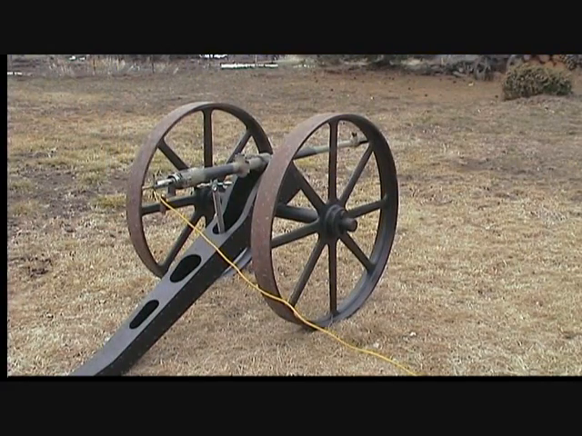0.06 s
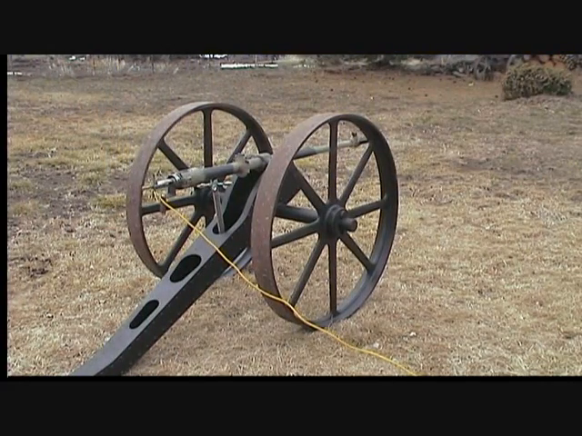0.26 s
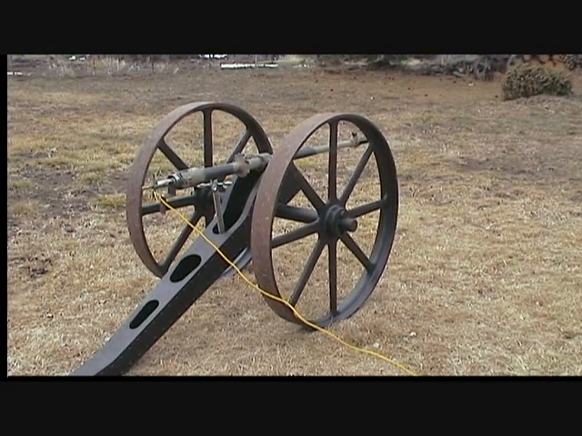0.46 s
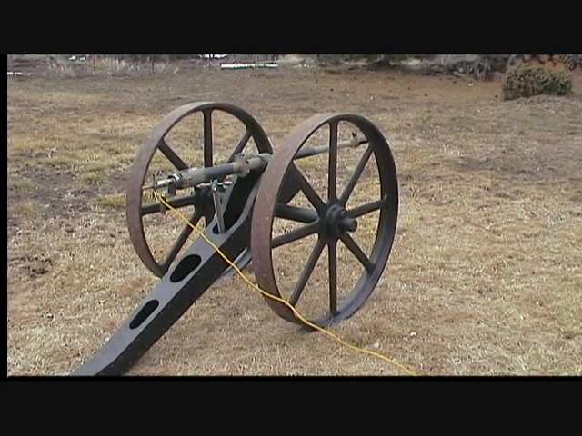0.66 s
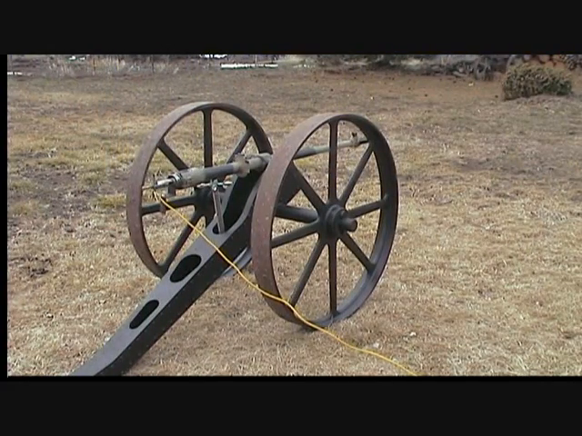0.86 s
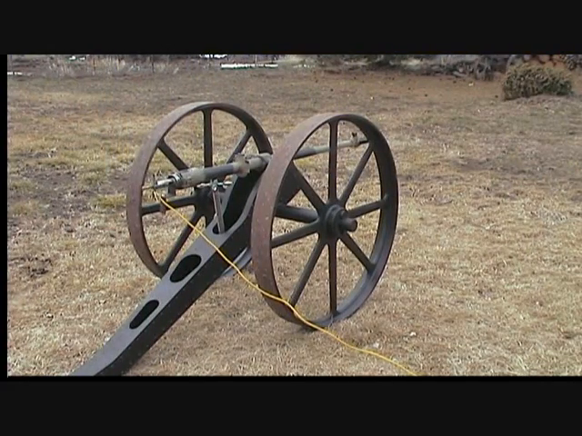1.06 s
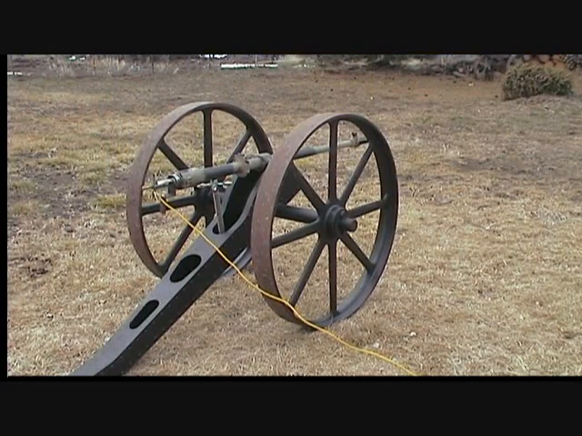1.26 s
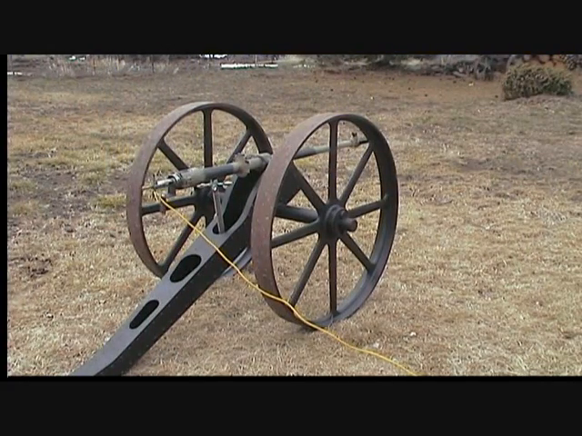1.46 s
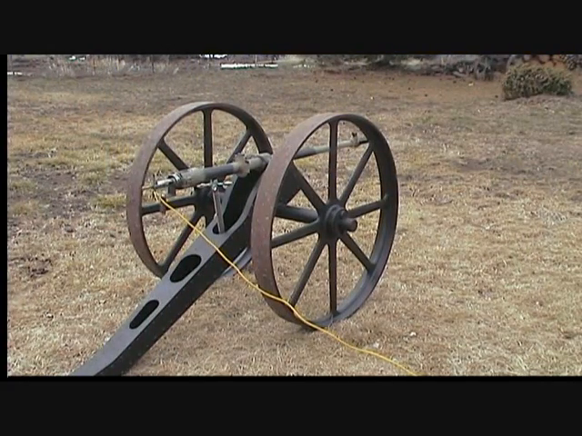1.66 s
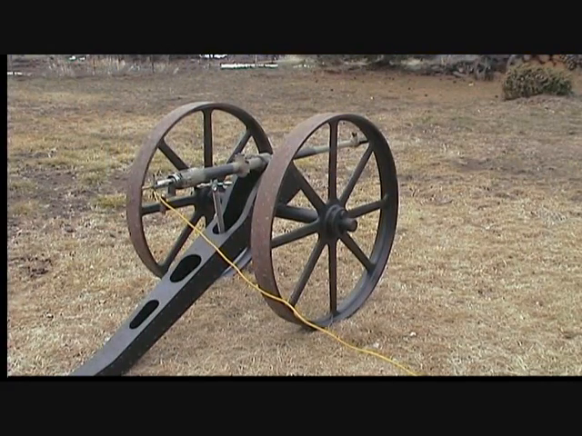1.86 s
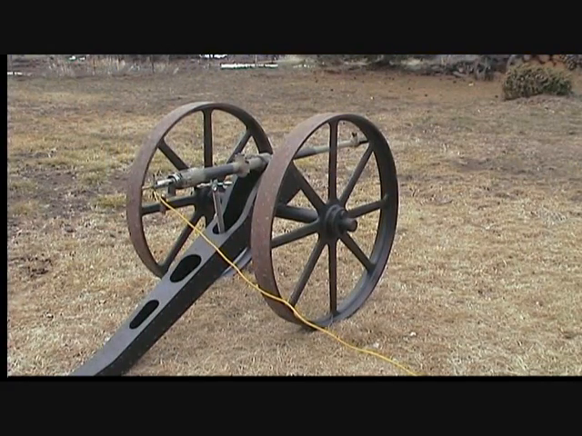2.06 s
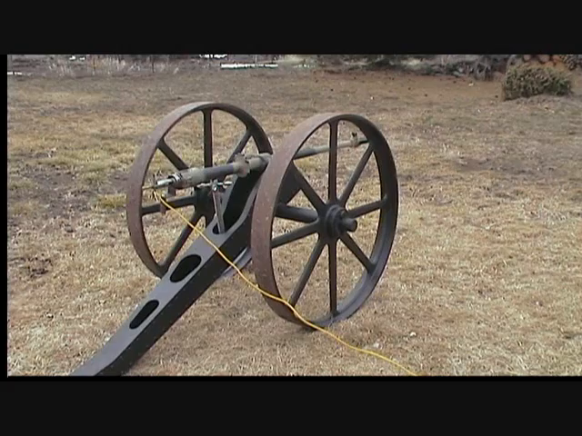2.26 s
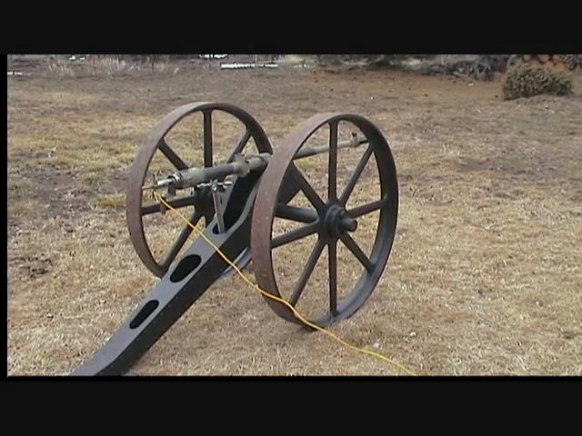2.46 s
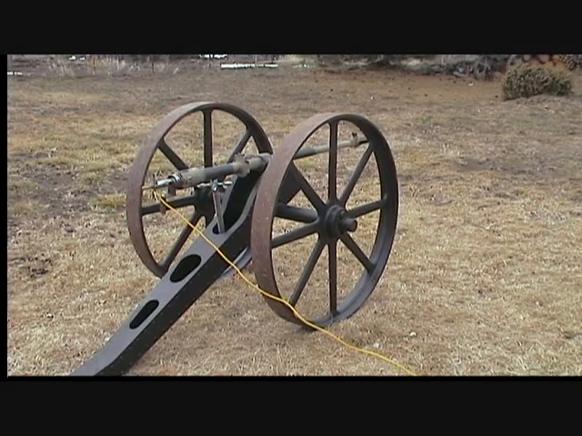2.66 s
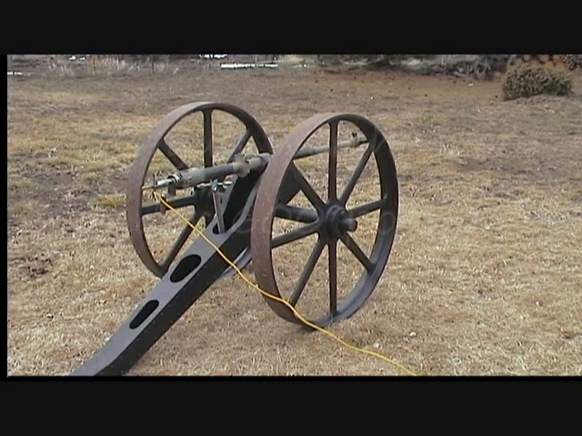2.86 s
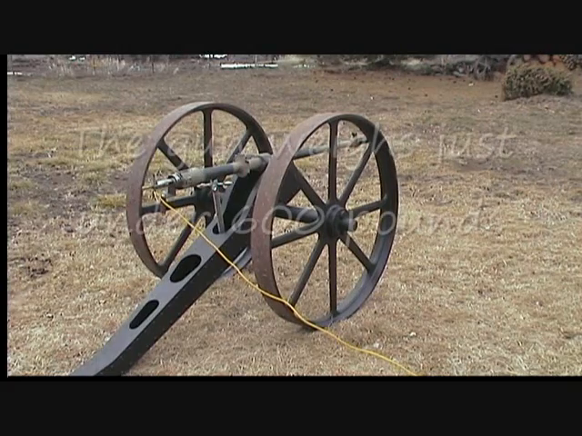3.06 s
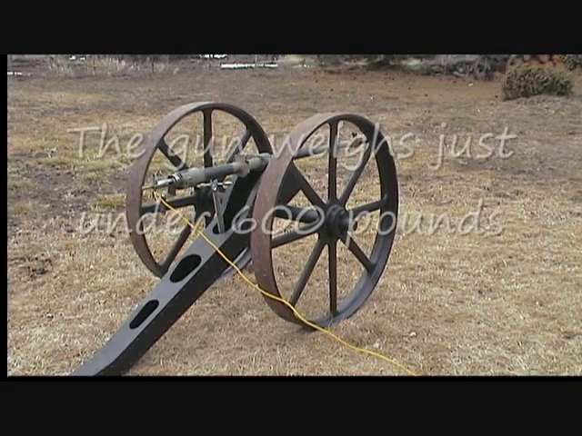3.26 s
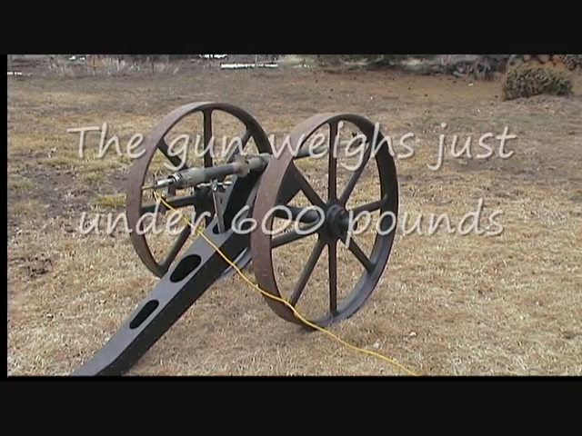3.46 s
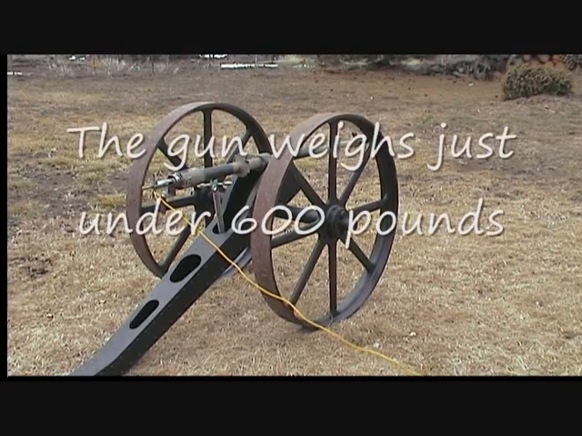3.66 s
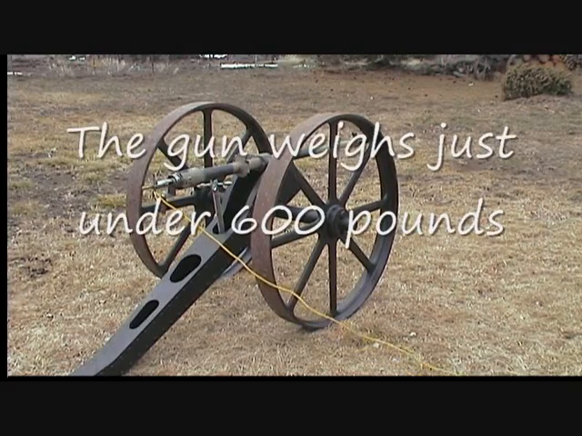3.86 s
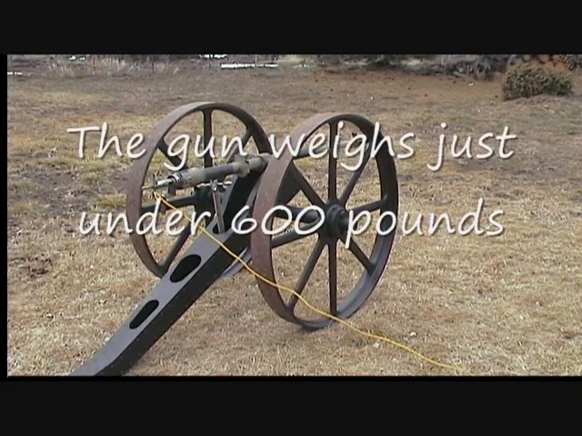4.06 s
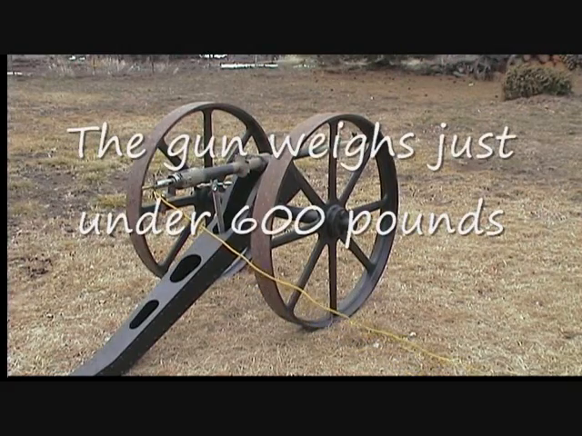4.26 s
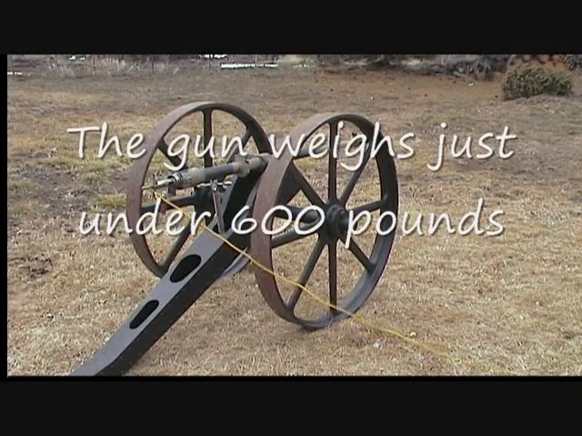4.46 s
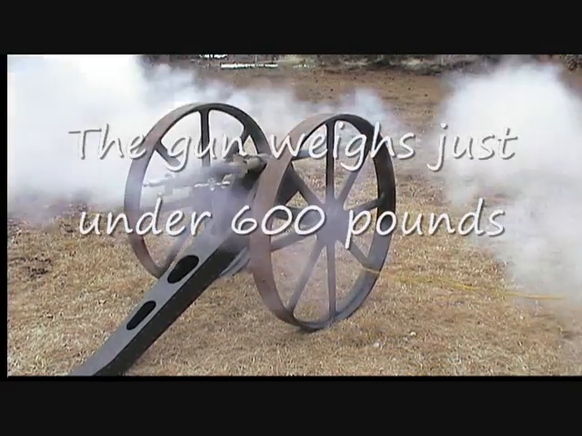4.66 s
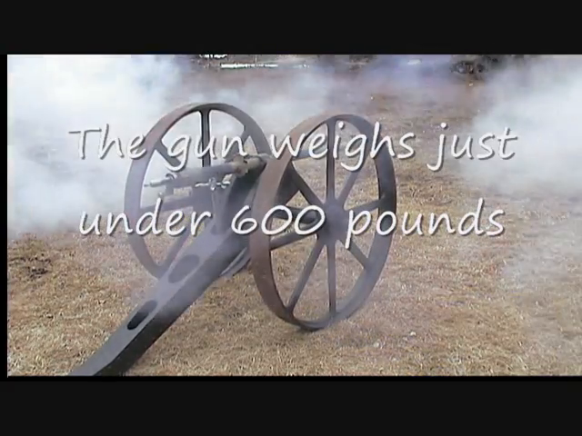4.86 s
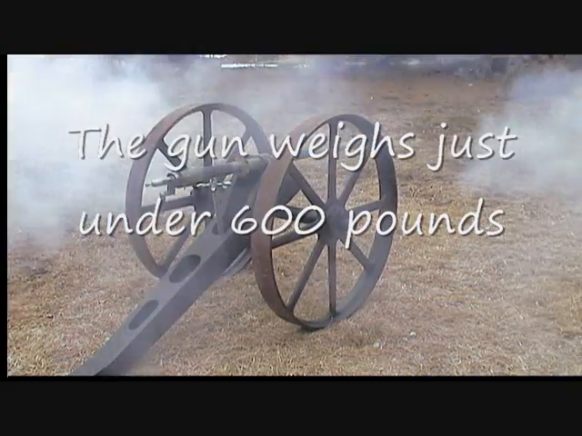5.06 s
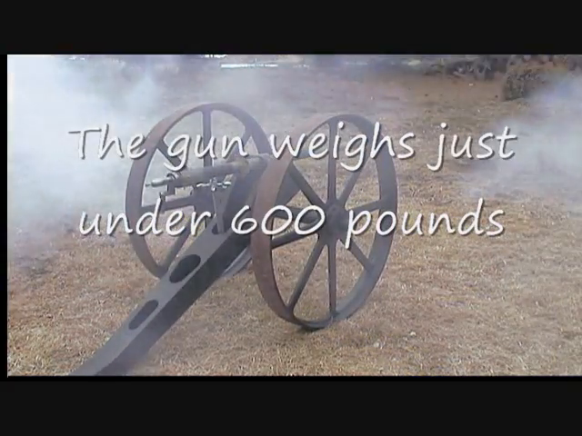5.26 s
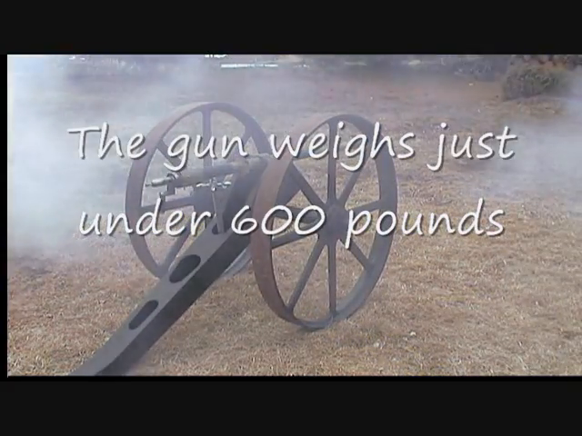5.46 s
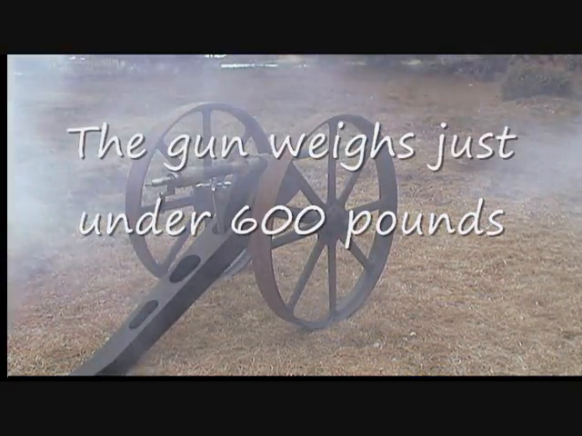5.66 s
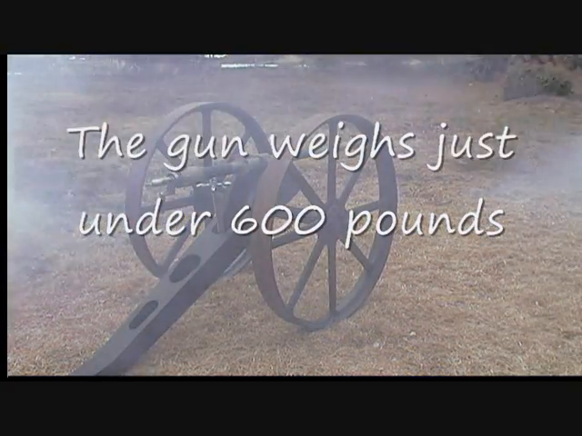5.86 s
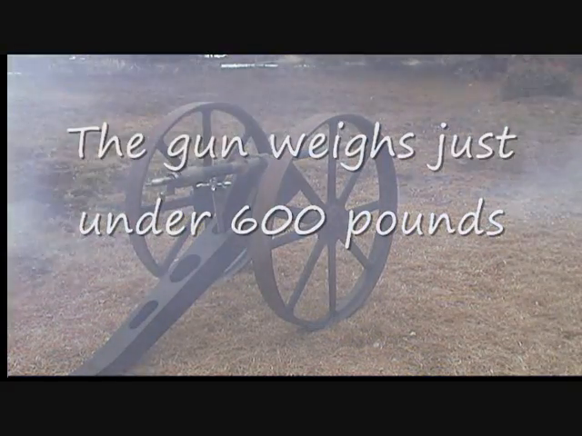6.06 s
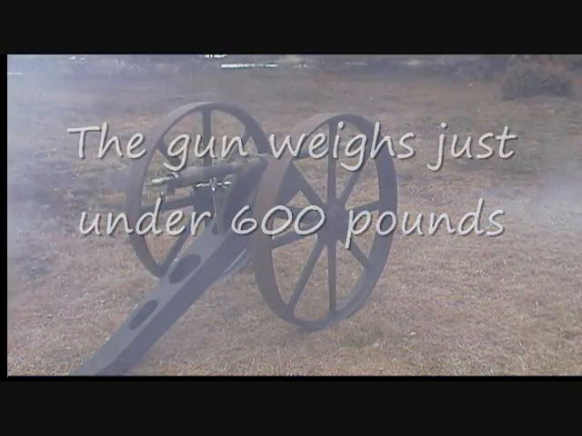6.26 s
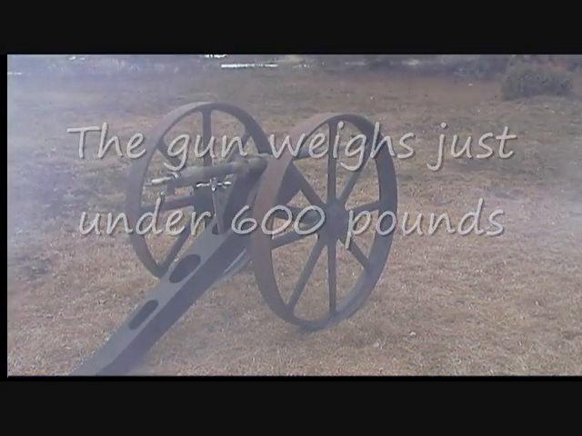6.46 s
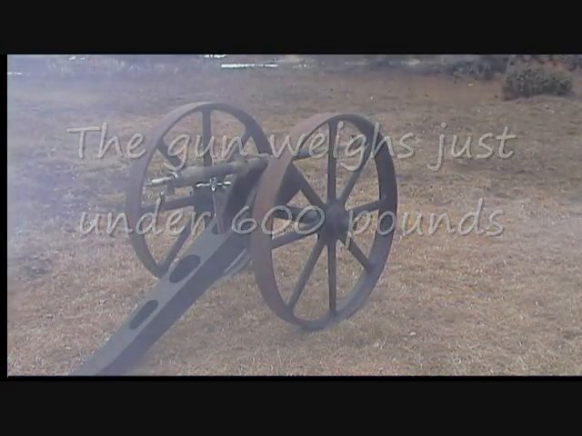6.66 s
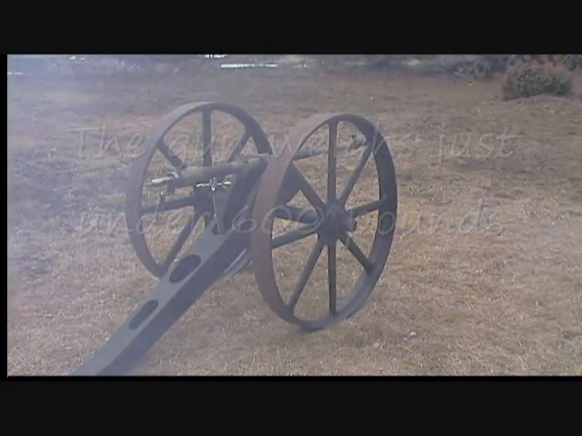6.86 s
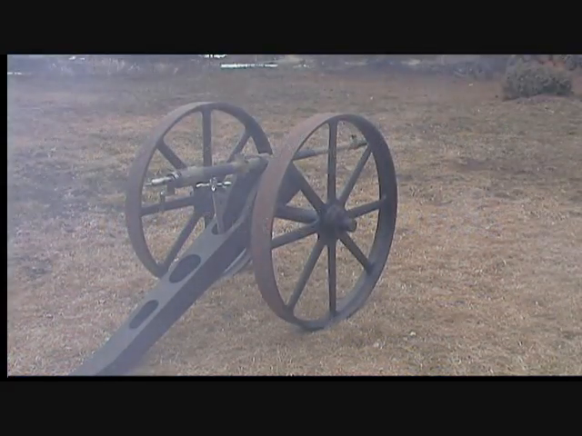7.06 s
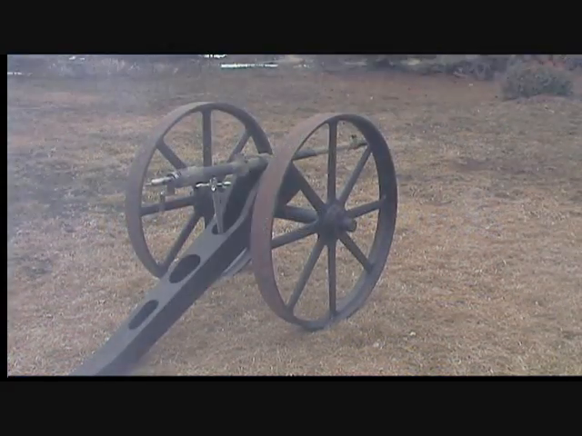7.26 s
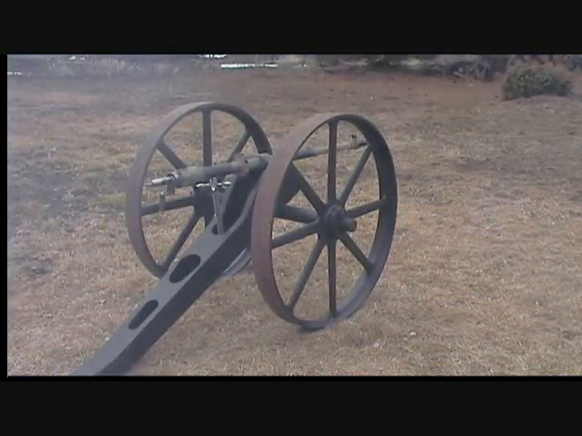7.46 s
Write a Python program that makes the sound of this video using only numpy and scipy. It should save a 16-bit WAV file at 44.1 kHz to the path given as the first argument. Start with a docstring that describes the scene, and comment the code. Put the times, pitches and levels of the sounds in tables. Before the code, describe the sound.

An open field heard through a close camcorder microphone with narrow stereo. From 0 s a steady low motor hum near 150 Hz with faint high whine and fluttering hiss continues throughout. Dull dragging steps come around 0.65-0.72 and 1.04-1.43 s, with a sharp grass crunch and tiny metallic tick near 1 s. Low wind buffets bump at 1.5-2.6 s; a heavier one at 3.3 s meets brisk dry rustling until 3.5 s. Light ticks at 4.55 s precede a single cannon shot at 4.65 s: instant, harsh, clipped crack with a brief gas burst and heavy boom. Ground bounces merge into it. Crackling roll surges again at 4.9, with strong slaps around 5.04-5.08 and 5.28 s, then darkens and falls. Gain ducks and slowly recovers. Debris and stalk ticks follow from 5 to 7.3 s, with faint rounded echoes and rumble at 6.1-6.7 s and wind bumps at 6.7 and 7.3 s.

```python
"""Small cannon in an open field

One shot close to a camcorder: report and ground bounces are pressure pulses, the gas jets are bands of noise.
Echoes from trees and slopes are inverted, rounded pulses over a roll of filtered clicks that dulls with time.
Before and after: motor whine (sines), fluttering hiss, wind on the microphone (filtered clicks and buffets),
rustles, ticks and dull steps in dry grass. The report overloads the input and the level ducks, then recovers.
All source levels are as they reach the microphone, ahead of that input stage."""
import sys
import numpy as np
from scipy import signal
from scipy.fft import rfft, irfft
from scipy.io import wavfile
from scipy.ndimage import uniform_filter1d

SR = 44100
rng = np.random.default_rng(int(sys.argv[2]) if len(sys.argv) > 2 else 0)


def unload_wav(signal):
    """Save mono or channel-first audio to the path in sys.argv[1] as 16-bit WAV at rate SR, clipped to [-1, 1]."""
    wavfile.write(
        sys.argv[1],
        SR,
        np.round(np.clip(np.atleast_2d(signal).T, -1, 1) * 32767).astype(np.int16),
    )


N = 331384  # samples

# Camcorder motor tones. Each row: multiple of the motor speed, level in dB rms.
MOTOR_TONES = [(1, -44), (2, -73), (9, -71.5), (12, -71.5), (14, -78), (19, -74), (22, -75.5), (24, -75),
               (26, -74), (27, -75), (28, -80.5), (36, -65), (40, -75.5), (42, -88), (68, -82)]
MOTOR_HZ = 149.85
# Hiss spectrum. Each row: frequency in Hz, relative level in dB per Hz.
HISS_SPECTRUM = [(60, -48), (90, 1.5), (200, -0.5), (620, -5.5), (810, -11.5), (950, -9.5), (1130, -16.5),
                 (1350, -12), (1520, -16), (1850, -13), (2600, -18), (6000, -20), (9000, -20), (12000, -18),
                 (13500, -20.5), (15000, -25)]
HISS_DB = -53  # rms

# Wind strength at the microphone. Each row: time in seconds, level in dB.
WIND_LEVEL = [(0.0, -41.5), (0.41, -56), (0.46, -45.5), (1.37, -49), (1.46, -33), (2.37, -45.5),
              (3.14, -39), (3.33, -20.5), (3.37, -27), (4.16, -41), (4.2, -35), (4.6, -40.5), (6.5, -43.5),
              (7.0, -38.5), (7.3, -37), (7.51, -44)]
# Wind spectrum. Each row: frequency in Hz, relative level in dB per Hz.
WIND_SPECTRUM = [(8.8, -31), (15, 0), (49, -2.5), (124, -20.5), (155, -19.5), (174, -38.5), (220, -29.5),
                 (290, -66), (480, -120)]
# Single buffets on the microphone. Each row: crest in seconds, peak in dB, pitch in Hz, push +1 or pull -1.
WIND_BUFFETS = [(1.476, -21.5, 40.7, 1), (1.601, -24, 50, -1), (2.053, -20.5, 39.8, 1),
                (2.202, -25.5, 35, 1), (2.583, -25, 34.8, 1), (3.328, -11, 39.4, 1), (3.85, -24, 70.4, 1),
                (6.736, -18, 65.5, -1), (7.247, -26, 65.4, -1), (7.305, -20.5, 50, -1)]
# The blast stirs the air at the microphone.
SURGE_DB, SURGE_RISE_S, SURGE_FALL_DB_PER_S = -17.5, 0.58, 34

# Rustles in the grass. Each row: start in seconds, length in seconds, level in dB rms before the swell,
# centre in Hz, width in octaves.
GRASS_RUSTLES = [(0.001, 0.32, -50.5, 5000, 12), (0.659, 0.07, -48.5, 2500, 6.3),
                 (0.974, 0.039, -29.5, 3940, 16), (0.999, 0.062, -37, 1490, 3.7),
                 (1.124, 0.037, -47.5, 6000, 2.5), (1.725, 0.14, -45.5, 2200, 1.17),
                 (1.842, .1, -39, 2070, 0.84), (1.846, 0.093, -49, 10200, 0.23),
                 (1.953, 0.038, -51.5, 3440, 0.99), (2.827, 0.039, -47, 5000, 3.7),
                 (3.095, 0.12, -51.5, 2920, 1.5), (3.243, 0.06, -47, 3240, 0.9),
                 (3.386, 0.066, -35.5, 5000, 3.4), (3.387, 0.13, -40, 420, 0.87),
                 (3.392, 0.084, -42, 1320, 0.41), (3.435, 0.058, -34, 7100, 1.2),
                 (3.447, 0.053, -33, 2600, 0.59), (3.466, 0.095, -46.5, 2350, 1.35),
                 (3.78, 0.75, -56.5, 9000, 1.8), (4.485, 0.046, -48, 1640, 0.42),
                 (4.37, 0.7, -46.5, 5070, 5), (5.322, 0.041, -37, 7000, 2.2),
                 (5.892, 0.065, -45.5, 4050, 1.4), (6.165, 0.033, -44.5, 2230, 0.58),
                 (6.306, 0.087, -53, 6300, 0.92), (5.9, 1.46, -53.5, 3660, 1.37),
                 (6.961, 0.04, -42, 6760, 0.92), (7.01, 0.15, -51, 6900, 4.2),
                 (7.337, 0.064, -53, 4630, 0.55)]
RUSTLE_CREST = 0.3  # loudest at this share of its length
# Debris falls back. One row: start in seconds, length in seconds, level in dB rms before the swell,
# centre in Hz, width in octaves, crest as a share of the length.
DEBRIS_PATTER = (5, 1, -57.5, 5500, 1.1, 0.16)
# Snaps of stalks and grit. Each row: start in seconds, peak in dB, pitch in Hz.
STALK_TICKS = [(0.979, -27, 3000), (0.997, -35, 6500), (1.0534, -31, 6000), (1.7494, -30.5, 1680),
               (2.7814, -34, 7140), (3.4018, -38, 5000), (4.535, -30, 3220), (4.576, -30, 4970),
               (5.365, -26, 5550), (5.393, -22, 5900), (5.8335, -28.5, 3520), (5.912, -28, 3440),
               (6.045, -33, 4100), (6.44, -33.5, 6080), (6.484, -25, 8700), (6.7113, -31, 9300),
               (6.7813, -28.5, 2240), (6.809, -31.5, 5000), (7.02, -32, 2340), (7.3384, -24, 5570)]
# Dull steps. Each row: start in seconds, peak in dB, pitch in Hz.
STEP_KNOCKS = [(0.647, -25, 384), (0.695, -22, 231), (0.719, -37, 303), (1.04, -31.5, 790),
               (1.129, -27.5, 256), (1.362, -27.5, 460), (1.427, -31, 386), (3.063, -34, 318)]
# Each step drags a little: level and pitch are against its knock.
SCUFF_S, SCUFF_DB, SCUFF_PITCH_RATIO, SCUFF_OCTAVES = 0.044, -18.5, 0.86, 1.62
# A small metal part rings. Each row: start in seconds, peak in dB, pitch in Hz, time to fall 60 dB in seconds.
METAL_PINGS = [(1.0137, -22.5, 9960, 0.047)]

SHOT_S = 4.6525
# Muzzle report and its bounces off the ground. Each row: start in seconds, level in dB, length of the push in ms.
REPORT_PULSES = [(4.653, 7, 0.06), (4.6603, 8.5, .5), (4.6635, 9.5, 0.86), (4.665, 15, 1),
                 (4.669, -3, 0.12)]
# Gas roars out of the vent, then the muzzle. Each row: start in seconds, length in seconds,
# level in dB rms before the swell, centre in Hz, width in octaves, crest as a share of the length.
GAS_JETS = [(4.6541, 0.0052, 2.9, 2566, 0.63, .15), (4.659, 0.056, 2.1, 3960, 3.6, 0.15)]
# Strong single echoes from far trees and slopes. Each row: start in seconds, level in dB before rounding,
# length of the push in ms before rounding.
FAR_ECHOES = [(4.852, -2, 1.5), (4.92, -7, 0.89), (5.04, 8, 1.2), (5.046, -10, 1.3), (5.052, -7, .08),
              (5.053, -9, 0.67), (5.055, 8, 4.9), (5.078, 9, 5.7), (5.155, 1, 0.89), (5.179, -3, 1.6),
              (5.276, 3.5, 0.82), (6.107, -20, 0.64), (6.231, -15.5, 0.74), (6.359, -14.5, 0.7),
              (6.435, -12.5, 0.89), (6.473, -13, 0.64), (6.609, -10.5, 0.89), (6.687, -12, 1.35)]
# The roll returns in waves from field, tree lines and far slopes. Each row: arrival in seconds, rise in seconds,
# boom in dB, crackle in dB, fall of the boom in dB per second.
ROLL_WAVES = [(4.659, 0.033, 12, 5, 85.5), (4.755, 0.0093, -8, -1, 147), (4.925, 0.091, -9, -14.5, 49),
              (5.034, 0.014, 1.5, -8, 196), (5.095, 0.071, -6.5, -13, 87), (5.23, 0.039, -16.5, -23.5, 71),
              (5.3, 0.088, -23.5, -32.5, 19.5), (5.981, 0.05, -32, -53, 15.5), (6.2, 0.24, -34, -53, 29),
              (6.56, 0.1, -34.5, -51.5, 11)]
CRACKLE_FALL_RATIO = 1.28  # the crackle dies faster than the boom
# Low part of the roll. Each row: frequency in Hz, relative level in dB per Hz.
BOOM_SPECTRUM = [(15, -40.5), (30, -9), (60, 1), (95, 4), (135, 1), (200, -1), (320, -7.5), (480, -19),
                 (900, -31), (1500, -59.5)]
# High part of the roll, before the air dulls it. Each row: frequency in Hz, relative level in dB per Hz.
CRACKLE_SPECTRUM = [(200, -41.5), (400, -8.5), (900, -1), (1540, -5.5), (3670, -9.5), (8000, -19.5),
                    (13300, -20.5), (15500, -67.5)]
# Loss on the longer path, ahead of levelling the middle band. Each row: frequency in Hz, loss in dB per second.
AIR_LOSS = [(500, -6), (1000, 4), (1600, 4), (3000, 20), (6000, 47), (12000, 68)]

# Phase between the microphone ports. Each row: frequency in Hz, radians by which left leads.
PORT_LEAD = [(20, 0), (800, -.04), (2400, -.2), (5500, -.8), (9000, -1.5), (12000, -2.1), (14000, -2.6),
             (16000, -3.0)]
# Balance of the ports. Each row: frequency in Hz, dB by which left is louder.
PORT_BALANCE = [(60, .4), (200, 0), (4400, -.3), (9000, 1.4)]
# What the ports do not have in common. Each row: frequency in Hz, left-right difference in dB against the field.
PORT_DIFFERENCE = [(20, -17), (100, -21), (250, -28), (1500, -22), (5000, -9), (12000, -5)]
EDGE_HZ = 15700  # upper limit of the sound


def amp(db):
    """Decibels to gain."""
    return 10 ** (np.asarray(db) / 20)


def evened(x):
    """Scales to rms 1."""
    return x / np.sqrt(np.mean(x ** 2) + 1e-20)


def read(points, hz):
    """Reads a spectrum table on a log-frequency axis."""
    f, value = np.transpose(points)
    return np.interp(np.log(hz + 1), np.log(f + 1), value)


def follow(rows):
    """A level curve as gain per sample, near silence outside it."""
    times, levels_db = np.array(rows).T
    return amp(np.interp(np.arange(N) / SR, times, levels_db, -150, -150))


def add(mix, start, sound):
    """Mixes a sound in at a time in seconds."""
    part = mix[round(start * SR):][:len(sound)]
    part += sound[:len(part)]


def coloured(x, points):
    """Gives x a spectrum, at rms 1."""
    gain = amp(read(points, np.fft.rfftfreq(N, 1 / SR)))
    return evened(irfft(rfft(x) * gain, N))


def grains(per_s, spread_db):
    """Sparse clicks of random sign and size; a positive spread makes a few of them large."""
    chance, sign, size = rng.random((N, 3)).T
    return (chance < per_s / SR) * np.sign(sign - 0.5) * amp(-spread_db * np.log(size + 0.0037))


def swell(start, rise, db, fall_db):
    """Gain that rises from silence at the start, then falls so many dB a second."""
    t = np.arange(N) / SR - start
    return np.clip(t / rise, 0, 1) ** 2 * amp(db - fall_db * np.maximum(t - rise, 0))


def rustle(source, start, length, db, hz, octaves, crest):
    """Friction or rushing gas: one band of the source that swells to a crest and dies away."""
    x = source[round(start * SR):][:round(length * SR)]
    octaves_off = np.log2(np.fft.rfftfreq(len(x), 1 / SR) / hz + 1e-9)
    band = np.exp(-0.5 * (octaves_off / octaves) ** 2)
    u = np.linspace(0, 1, len(x))
    ramps = np.minimum(u / max(crest, 0.02), (1 - u) / max(1 - crest, 0.02))
    envelope = np.clip(ramps, 0, 1) ** 0.89
    return amp(db) * evened(irfft(rfft(x) * band, len(x))) * envelope


def camcorder():
    """Steady harmonics of the motor speed over a hiss that flutters in patches, most in the low middle."""
    t = np.arange(N) / SR
    tones = np.zeros(N)
    for multiple, db in MOTOR_TONES:
        tones += np.sqrt(2) * amp(db) * np.sin(2 * np.pi * (multiple * MOTOR_HZ * t + rng.random()))
    hz, _, z = signal.stft(coloured(rng.standard_normal(N), HISS_SPECTRUM), SR, nperseg=1024)
    patches = uniform_filter1d(rng.standard_normal(z.shape), size=5, axis=0)  # across frequency
    patches = evened(uniform_filter1d(patches, size=4, axis=1))  # across time
    depth_db = read([(300, 2.8), (6000, 1.4)], hz)[:, None]  # rms flutter at each Hz
    hiss = signal.istft(z * amp(depth_db * patches), SR, nperseg=1024)[1][:N]
    return tones + amp(HISS_DB) * evened(hiss)


def wind():
    """Turbulence at the microphone: lumpy low noise, stirred up by the blast, and single buffets."""
    surge = swell(SHOT_S, SURGE_RISE_S, SURGE_DB, SURGE_FALL_DB_PER_S)
    level = np.hypot(follow(WIND_LEVEL), surge)
    out = coloured(grains(per_s=67, spread_db=-1.0), WIND_SPECTRUM) * level
    for crest_s, db, hz, sign in WIND_BUFFETS:
        u = np.arange(-1, 1, hz / SR)  # cycles from the crest
        buffet = np.cos(2 * np.pi * u) * np.exp(-(u / 0.28) ** 2)
        add(out, crest_s - 1 / hz, np.sign(sign) * amp(db) * buffet)
    return out


def snaps():
    """Stalks and grit snap as fast-dying sines, debris patters down, and all of it scatters off the stalks."""
    out, t = np.zeros(N), np.arange(4000) / SR
    add(out, DEBRIS_PATTER[0], rustle(grains(per_s=75, spread_db=3.0), *DEBRIS_PATTER))
    for start, db, hz in STALK_TICKS:
        add(out, start, amp(db - 7.6 * hz * t) * np.sin(2 * np.pi * hz * t))  # loses 7.6 dB each cycle
    splinter = amp(-17.5 - 60 * t / 0.021) * rng.standard_normal(len(t))  # falls 60 dB in 21 ms
    return out + signal.oaconvolve(out, splinter)[:N]


def grass():
    """Dry grass crunches in bands of dense grains; snaps, dull dragging steps and a metal ring on top."""
    out, t = snaps(), np.arange(4000) / SR
    crunch = grains(per_s=5000, spread_db=3.5)
    for row in GRASS_RUSTLES:
        add(out, row[0], rustle(crunch, *row, RUSTLE_CREST))
    for start, db, hz in STEP_KNOCKS:
        add(out, start, amp(db - 10.0 * hz * t) * np.sin(2 * np.pi * hz * t))  # loses 10 dB each cycle
        scuff = rustle(crunch, start, SCUFF_S, db + SCUFF_DB, hz * SCUFF_PITCH_RATIO, SCUFF_OCTAVES, 0)
        add(out, start, scuff)
    for start, db, hz, t60 in METAL_PINGS:
        add(out, start, amp(db - 60 * t / t60) * np.sin(2 * np.pi * hz * t))
    return out


def pulse(db, ms):
    """A blast wave: sudden push, longer suction."""
    u = np.arange(2000) / SR * 1000 / ms
    return amp(db) * (1 - u) * np.exp(-u)


def report():
    """Muzzle blast with its ground bounces, and the gas jets as bands of noise."""
    out, gas = np.zeros(N), rng.standard_normal(N)
    for row in GAS_JETS:
        add(out, row[0], rustle(gas, *row))
    for start, db, ms in REPORT_PULSES:
        add(out, start, pulse(db, ms))
    return out


def echoes():
    """Single returns from trees and slopes: inverted blast waves, rounder the longer the path."""
    out = np.zeros(N)
    for start, db, ms in FAR_ECHOES:
        rounding = signal.windows.hann(round(4 + 45 * ms * (start - SHOT_S)))
        add(out, start, -np.convolve(pulse(db, ms), rounding / rounding.sum()))
    return out


def roll_levels():
    """Gains of boom and crackle: the waves add up in power."""
    boom = sum(swell(s, rise, db, fall) ** 2 for s, rise, db, _, fall in ROLL_WAVES)
    crackle = sum(swell(s, rise, db, fall * CRACKLE_FALL_RATIO) ** 2 for s, rise, _, db, fall in ROLL_WAVES)
    return np.sqrt(boom), np.sqrt(crackle)


def roll():
    """Scattered returns from the land: a boom, and a crackle that the air dulls with time."""
    boom_level, crackle_level = roll_levels()
    boom = coloured(grains(per_s=700, spread_db=1.0), BOOM_SPECTRUM)
    crackle = coloured(grains(per_s=3000, spread_db=1.0), CRACKLE_SPECTRUM)
    hz, t, z = signal.stft(crackle, SR, nperseg=256)
    loss = amp(-read(AIR_LOSS, hz)[:, None] * np.clip(t - SHOT_S, 0, 1.8))  # no further loss after 1.8 s
    power = (abs(z) ** 2).mean(1, keepdims=True) * loss ** 2
    middle = (hz > 700) & (hz < 3000)
    z = z * loss / np.sqrt(2 * power[middle].sum(0))  # the waves set the level of the middle band
    dulled = signal.istft(z, SR, nperseg=256)[1][:N]
    return boom * boom_level + dulled * crackle_level


def cannon():
    """The shot close by, its single echoes and the roll from the land."""
    return report() + echoes() + roll()


def scene():
    """One sound field at two close microphone ports."""
    field = rfft(camcorder() + wind() + grass() + cannon())
    hz = np.fft.rfftfreq(N, 1 / SR)
    smear = rng.standard_normal(800) * np.exp(-np.arange(800) / 200)  # scatter close to the camcorder
    # half the difference goes to each port, with opposite sign
    apart = amp(read(PORT_DIFFERENCE, hz)) * rfft(smear / np.linalg.norm(smear), N) / 2
    left = 1 + apart
    right = (1 - apart) * np.exp(-1j * read(PORT_LEAD, hz)) / amp(read(PORT_BALANCE, hz))
    return irfft(field * np.array([left, right]), N)


def gain_control(stage):
    """Loud sound ducks both channels after a moment; the gain returns by a slow and a quick release."""
    smooth_power = uniform_filter1d((stage ** 2).mean(0), size=441)  # over 10 ms
    power_db = 10 * np.log10(abs(smooth_power) + 1e-12)
    duck_db = 0
    for share, knee_db, fall_db_per_s in [(0.42, -19, 12.4), (0.6, 0, 62)]:
        fall = np.arange(N) * fall_db_per_s / SR
        held_db = np.maximum.accumulate(power_db + fall) - fall  # peaks that leak away
        duck_db += share * np.maximum(held_db - knee_db, 0)
    r = np.exp(-1 / (0.0021 * SR))  # the gain glides with a 2.1 ms time constant
    delayed_db = np.roll(duck_db, 400)  # samples
    return stage / amp(signal.lfilter([1 - r], [1, -r], delayed_db))


def record(dry):
    """The input stage overloads, flat tops droop, gain control ducks and recovers, the converter clips."""
    treble = dry - uniform_filter1d(dry, size=40)
    overloaded = np.clip(dry, -3.0, 3.0) + 0.061 * treble  # treble leaks past the knee
    stage = signal.lfilter(*signal.butter(1, 14, "high", fs=SR), overloaded)  # droop
    clipped = np.clip(gain_control(stage), -1, 1)
    edge = signal.firwin(511, EDGE_HZ, window=("kaiser", 9), fs=SR)
    return np.clip(signal.oaconvolve(clipped, edge[None], "same"), -1, 1)


dry = scene()
out = record(dry)
unload_wav(out)
```